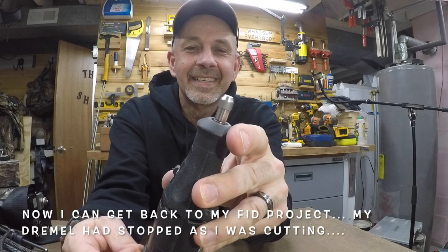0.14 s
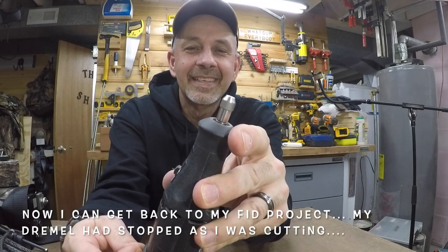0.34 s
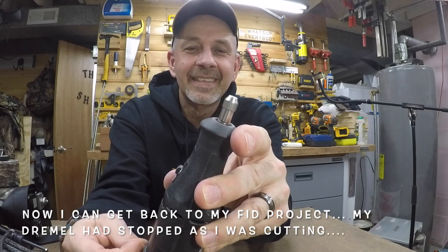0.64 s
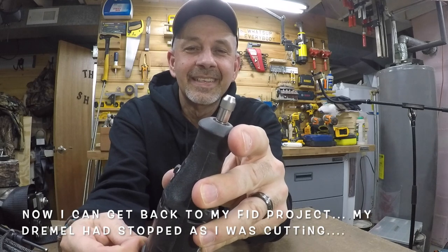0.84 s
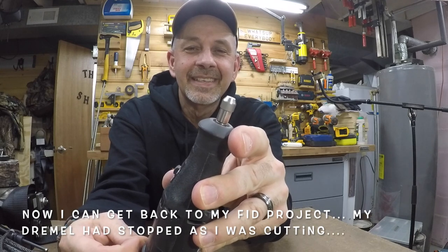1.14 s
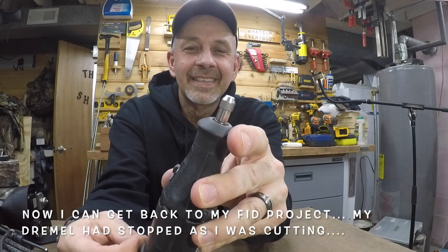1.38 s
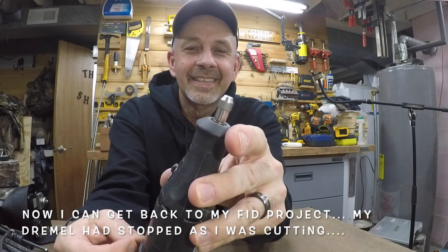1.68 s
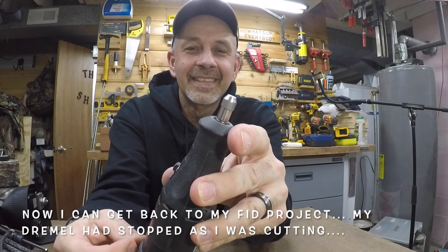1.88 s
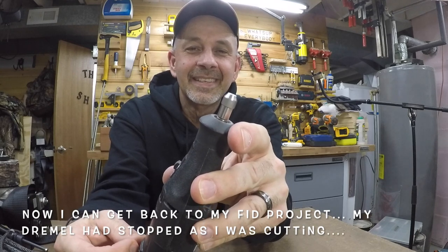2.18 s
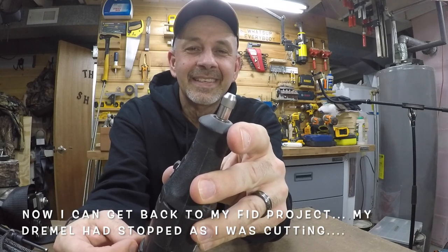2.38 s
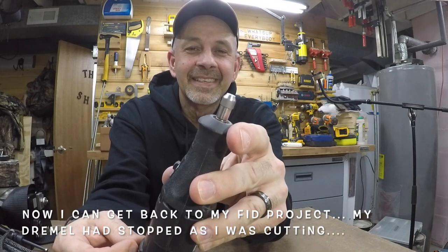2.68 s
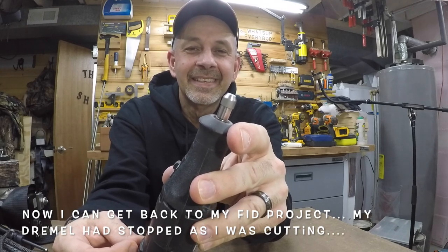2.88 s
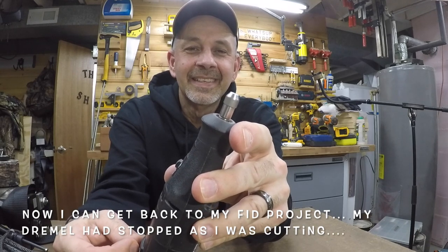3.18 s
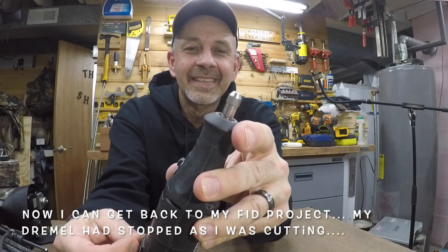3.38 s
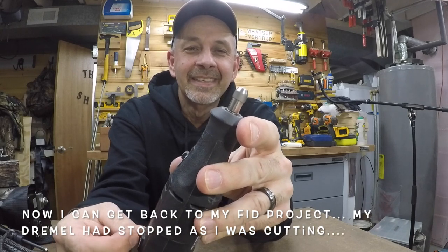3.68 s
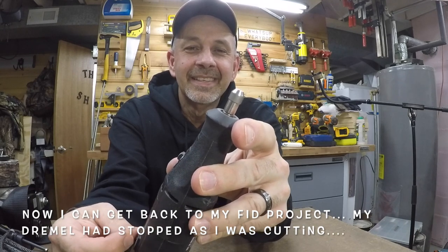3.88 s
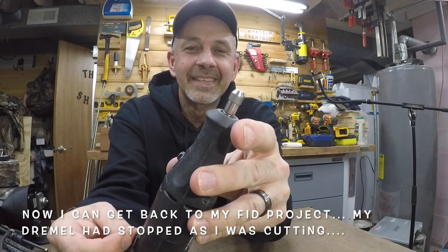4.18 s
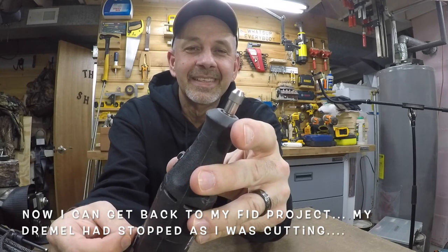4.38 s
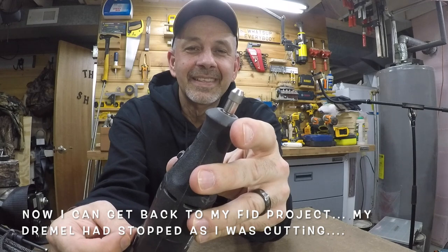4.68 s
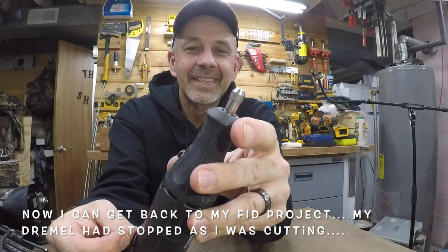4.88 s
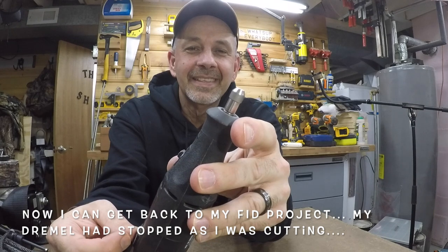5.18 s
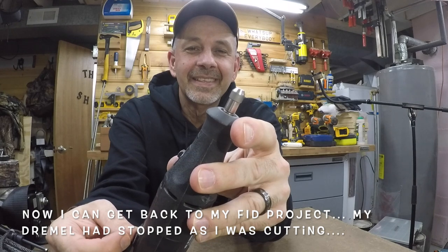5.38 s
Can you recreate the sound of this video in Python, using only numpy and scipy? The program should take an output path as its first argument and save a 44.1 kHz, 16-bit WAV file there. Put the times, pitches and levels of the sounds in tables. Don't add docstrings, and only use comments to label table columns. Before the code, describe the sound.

A small mains-powered rotary tool runs close to the microphone in an indoor workshop. Already spinning at a low whir, it revs up within about a second to a shrill, raspy whine with rushing fan air, holds for nearly two seconds, then sinks gradually in pitch and loudness, still turning at the end. Faint room hum lies beneath.

```python
import sys
import numpy as np
from scipy import signal
from scipy.fft import rfft, irfft
from scipy.io import wavfile
from scipy.ndimage import uniform_filter1d

SR = 44100
rng = np.random.default_rng(int(sys.argv[2]) if len(sys.argv) > 2 else 0)


def volts_from_db(level):
    exponent = np.asarray(level, float) / 20
    return 10 ** exponent


def wav_record(signal):
    frames = np.transpose(np.atleast_2d(signal))
    bounded = np.clip(frames, -1, 1)
    quanta = np.round(bounded * 32767).astype(np.int16)
    wavfile.write(sys.argv[1], SR, quanta)


N = 244478
T = np.arange(N) / SR
FREQS = np.fft.rfftfreq(N, 1 / SR)
FULL_HZ = 565
TWICE_MAINS_HZ = 120
TONE_LIMIT_HZ = 15600


def evened(x):
    return x / np.sqrt(np.mean(x ** 2) + 1e-20)


def curves(rows):
    seconds, *columns = np.transpose(rows)
    return [np.interp(T, seconds, column) for column in columns]


def read(points, hz):
    f, value = np.transpose(points)
    return np.interp(np.log(hz + 1), np.log(f + 1), value)


def peak(hz, centre_hz, width_hz):
    return 1 / (1 + ((hz - centre_hz) / width_hz * 2) ** 2)


def coloured(gain):
    return evened(irfft(rfft(rng.standard_normal(N)) * gain(FREQS), N))


def drift(rate_hz):
    return coloured(lambda hz: np.exp(-(hz / rate_hz) ** 2) * (hz > 0))


def line(turns, multiple, wobble):
    cycles = multiple * (turns + wobble) + rng.random()
    return np.sqrt(2) * np.cos(2 * np.pi * cycles)


def rotor():
    # time in seconds, speed the motor is heading for in Hz.
    dial_moves = [(0.0, 210.6), (0.277, 310.3), (0.453, 312.2), (0.633, 541.8), (0.684, 775.2),
                  (0.851, 638.3), (1.099, 590.6), (1.632, 573.6), (2.717, 574.1), (2.891, 500.7),
                  (3.024, 507.3), (3.153, 505.5), (3.64, 454.5), (3.981, 380.8), (4.584, 326.3),
                  (5.333, 286.6), (5.55, 228.6)]
    start_hz, inertia_s = 167.4, .6485
    dial, = curves(dial_moves)
    memory = np.exp(-1 / (inertia_s * SR))
    return dial, start_hz + signal.lfilter([1 - memory], [1, -memory], dial - start_hz)


def whine(dial, hz, turns, wobble):
    # multiple of shaft speed, level in dB.
    shaft_orders = [(2, -63.5), (3, -48.5), (4, -48), (5, -48), (6, -49.5), (7, -45), (9, -51),
                    (10, -49.5), (11, -51), (12, -51.5), (13, -54), (14, -54), (15, -62.5), (17, -47),
                    (18, -43), (1, -63),
                    (19, -54), (20, -48), (21, -47), (22, -48), (23, -45.5), (24, -43), (25, -45),
                    (26, -52), (27, -47), (28, -49), (29, -51), (30, -54), (33, -50), (34, -50), (36, -39)]
    db_per_octave, db_per_pull = 22.5, -1.5
    flutter_db, flutter_hz = 1.82, 8.7
    drive_db = db_per_octave * np.log2(hz / FULL_HZ) + db_per_pull * (dial / hz - 1)

    blades = 18
    calm_db = -64 - 70 * np.maximum(np.log2(hz / 220), 0)
    blade_db = calm_db + path_db(blades * hz) + flutter_db * drift(flutter_hz)
    out = volts_from_db(blade_db) * line(turns, blades, wobble)
    for k, db in shaft_orders:
        k = round(k)
        tone_db = db + drive_db + path_db(k * hz) + swell_db(k) + flutter_db * drift(flutter_hz)
        out += volts_from_db(tone_db) * line(turns, k, wobble)
    return out


def path_db(hz):
    # centre in Hz, width in Hz, gain in dB.
    path_bells = [(765, 40, -12), (982.5, 54, -11), (1000, 344, 26), (1072, 38, -6.0), (1275, 19, -8),
                  (1460, 49, 9), (1589, 56, 4.5), (1752, 345, 16.5), (2130, 16, 8), (2630, 714, 17),
                  (3003, 150, 7), (3300, 93, -5), (3480, 370, 7.5), (3920, 230, 6),
                  (4278, 551, 8.1), (4515, 166, 14.2), (4551, 381, -14.3), (4838, 396, 10.1),
                 (5720, 278, -6.4), (6085, 2556, 20.9), (7313, 100, 3.1), (7867, 40, -13.4),
                 (7982, 117, 3.1), (8473, 1950, 13.5), (9599, 142, -6.3), (10168, 742, 6.6),
                 (11655, 2110, 2.6), (13441, 45, -13.3)]
    axis_hz = np.arange(0, SR / 2, 5.)
    gain_db = sum(db * peak(axis_hz, f, w) for f, w, db in path_bells)
    return np.interp(hz, axis_hz, gain_db - 90 * (axis_hz > TONE_LIMIT_HZ))


def swell_db(multiple):
    # centre in seconds, multiple of shaft speed, length in seconds, change in dB.
    swells = [(.85, 15, .6, 21), (1.19, 14, 0.47, 9), (1.385, 18, 0.25, 7.5), (1.46, 13, .6, 1),
              (1.46, 23, 0.28, -13), (1.53, 6, 0.73, -12), (2.072, 12, .12, -15), (2.28, 13, 0.7, 5),
              (2.41, 15, .6, -15), (3.23, 24, .6, -23), (3.44, 17, .6, 5), (3.57, 13, 0.75, 7),
              (3.64, 20, .6, -10), (3.91, 24, .6, 7), (4.057, 5, 0.41, 8.5), (4.05, 15, 0.71, 13),
              (4.52, 20, 0.86, 7.5), (4.66, 19, 0.42, 16), (4.86, 17, 0.87, -19), (4.93, 13, .2, 14),
              (5.14, 15, .35, 16), (5.27, 7, 0.48, -15), (5.45, 2, 0.7, 18), (1.05, 9, 0.27, 7),
              (1.15, 5, 0.32, 5), (1.997, 3, 0.17, -8), (3.034, 3, 0.12, -4.5), (5.0, 10, 0.46, 4),
              (5.152, 3, 0.46, -1)]
    return sum(db * np.exp(-(2 * (T - s) / length) ** 2)
               for s, k, length, db in swells if round(k) == multiple)


def slots(hz, turns, wobble):
    # time in seconds, burst sharpness (0 steady, 1 half wave, 4 spikes),
    # pull in dB at 8 and at 16 per turn, winding buzz in dB.
    motor_current = [(0, 2.2, -71, -45, -57), (.22, 2, -69, -45.5, -48.5), (.42, 2.3, -62, -41, -47),
                     (.57, 2.1, -58, -46, -46), (.645, 1.9, -47, -54, -37), (.72, 1.1, -22.5, -50, -48),
                     (.81, .9, -35, -39, -54), (.98, .6, -36, -38, -56), (1.13, .3, -41, -45, -58),
                     (1.35, .1, -46, -34, -60), (1.75, .1, -32, -28, -60), (2.05, .1, -35, -31.5, -60),
                     (2.75, .1, -33.5, -37, -60), (3.25, .1, -38.5, -42, -60), (4.3, .2, -42, -52, -58),
                     (4.8, 1.5, -48, -43, -54), (5.1, 1.6, -36, -60, -57), (5.54, .9, -38.5, -55, -60)]
    slot_lines, winding_lines = (8, 16), (9, 10, 12, 14)
    sharpness, *pull_db, buzz_db = curves(motor_current)
    wave = np.cos(np.pi * (TWICE_MAINS_HZ * T - .75)) ** 2 + 1e-6
    current = wave ** np.maximum(sharpness, 0)
    current = current / uniform_filter1d(current, size=735) * volts_from_db(drift(37))

    pull = sum(volts_from_db(db + 1.95 * drift(7.7)) / stator(k * hz) * line(turns, k, wobble)
               for k, db in zip(slot_lines, pull_db))
    buzz = volts_from_db(buzz_db) * sum(line(turns, k, wobble) for k in winding_lines)
    shell = 1 / (1 + ((FREQS - 2760) / 380) ** 4)
    rung = irfft(rfft(current * pull) * stator(FREQS) + rfft(current * buzz) * shell, N)

    bars = 32
    bars_db = -53 + 15 * peak(bars * hz, 10100, 1300) - 60 * (bars * hz > TONE_LIMIT_HZ)
    return rung + volts_from_db(bars_db + 2.1 * drift(8.9)) * line(turns, bars, wobble)


def stator(hz):
    return 1 + volts_from_db(11.5) * peak(hz, 2490, 194)


def rattle(hz, turns):
    seated = np.log2(hz / 464)
    level_db = -24 + np.minimum(7 * seated, -7 * seated)
    beat = 1 + 0.3 * np.cos(2 * np.pi * turns) + 0.062 * np.cos(4 * np.pi * turns + 1)
    return volts_from_db(level_db + 0.68 * drift(40)) * beat * coloured(housing)


def housing(hz):
    # centre in Hz, width in Hz, level in dB.
    shell_modes = [(1367, 607, -10.5), (2580, 330, -14.5), (3490, 480, -17), (5090, 500, -11),
                   (6520, 1400, -3), (6530, 730, -17.5), (8120, 1200, -4), (8630, 570, -6.5),
                   (10550, 220, -12.5), (11600, 810, -15), (13300, 500, -14)]
    skirt = 1.43
    return np.sqrt(sum(volts_from_db(2 * db) * peak(hz, f, w) ** skirt for f, w, db in shell_modes))


def fan_air(hz, turns):
    octaves = np.log2(hz / FULL_HZ)
    beat = 1 + 0.043 * np.cos(2 * np.pi * turns + 2)
    air = coloured(vents)
    hiss = irfft(rfft(air) / (1 + (7700 / (FREQS + 1)) ** 8), N)
    air = air + (volts_from_db(3.5 * octaves + 0.56 * drift(25)) - 1) * hiss
    return volts_from_db(-20.5 + 10 * octaves + 0.25 * drift(6.3)) * beat * air


def vents(hz):
    # frequency in Hz, density in dB per Hz.
    air_spectrum = [(200, -47), (500, -11.5), (900, -9.5), (1500, -2.5), (2300, 7.5), (3000, 3.5),
                    (5000, 1), (7000, 4.5), (9500, 5), (11300, 2.5), (12300, 4), (13000, 1), (14400, 1.5),
                    (15200, -1.5)]
    return volts_from_db(read(air_spectrum, hz)) * (1 + volts_from_db(1.0) * peak(hz, 6450, 500))


def workshop():
    # frequency in Hz, density in dB per Hz.
    room_spectrum = [(20, -6), (50, -25), (62, 2.5), (110, -2), (200, -7.5), (260, -9), (330, -17.5),
                     (450, -20), (900, -19.5), (1500, -46), (4000, -65)]
    # multiple of twice the mains, level in dB rms.
    hum_lines = [(1, -56.5), (2, -61.5)]
    hum = np.zeros(N)
    for k, db in hum_lines:
        cycles = round(k) * TWICE_MAINS_HZ * T + rng.random()
        hum += volts_from_db(db + 3 + 3.5 * drift(3.3)) * np.sin(2 * np.pi * cycles)
    return volts_from_db(-52) * coloured(lambda hz: volts_from_db(read(room_spectrum, hz))) + hum


def scene():
    dial, hz = rotor()
    turns, wobble = np.cumsum(hz) / SR, 0.0034 * drift(13.3)
    tool = whine(dial, hz, turns, wobble) + slots(hz, turns, wobble)
    mono = tool + rattle(hz, turns) + fan_air(hz, turns) + workshop()
    return np.array([mono, mono])


def top_cut(x):
    return signal.sosfilt(signal.butter(12, 15330, fs=SR, output="sos"), x)


def record(dry):
    # time in seconds, low edge in Hz, high edge in Hz.
    split_bands = [(.79, 6900, 9100), (.88, 11800, 13300), (1.835, 6300, 7800), (1.86, 13800, 15300),
                   (2.51, 7500, 9200), (2.975, 12400, 14600), (3.115, 8900, 10500), (3.115, 13100, 14600),
                   (3.46, 6800, 8400), (4.81, 4200, 5400), (4.81, 12400, 13900), (4.995, 5100, 6500),
                   (5.065, 11000, 12500)]
    side, hz = np.zeros(N), np.fft.rfftfreq(2048, 1 / SR)
    for s, low, high in split_bands:
        start = 924 + 1024 * round((s * SR - 924) / 1024 - 1)
        at = slice(start, start + 2048)
        backwards = dry[0, at][::-1]
        band = irfft(rfft(backwards) * (hz > low) * (hz < high))
        side[at] += volts_from_db(-4.5) * band * signal.windows.tukey(2048, .9)
    return top_cut(dry + np.outer([1, -1], side))


dry = scene()
out = record(dry)
wav_record(out)
```